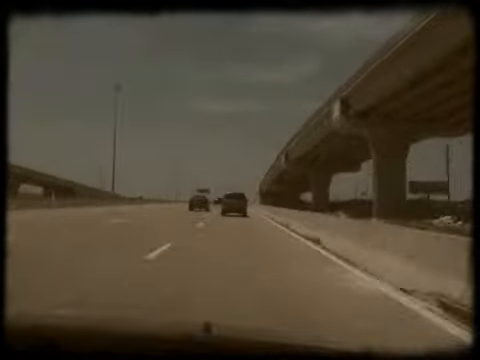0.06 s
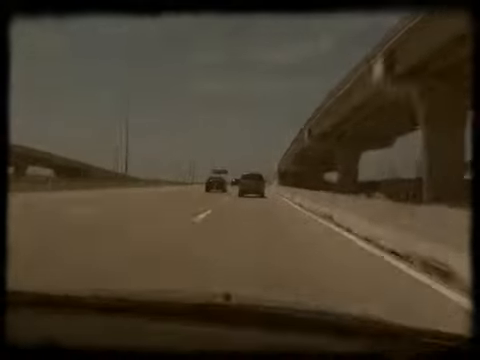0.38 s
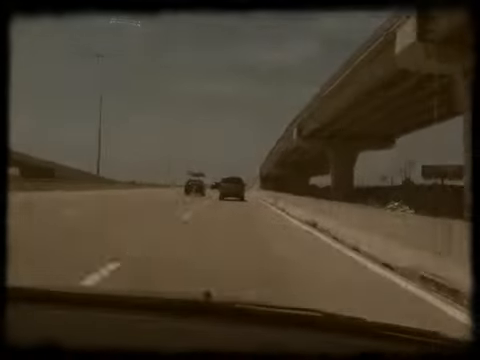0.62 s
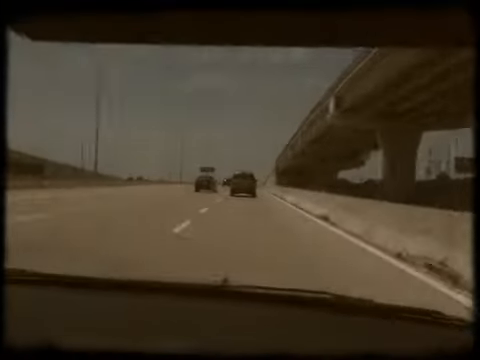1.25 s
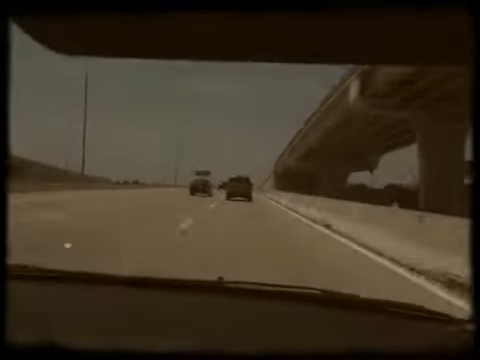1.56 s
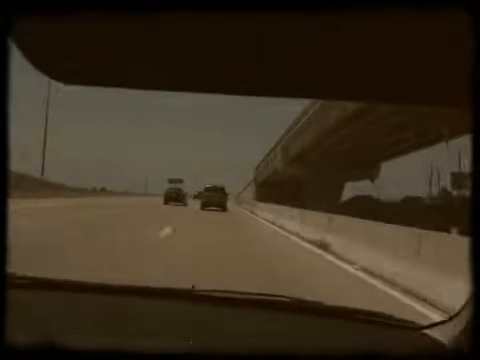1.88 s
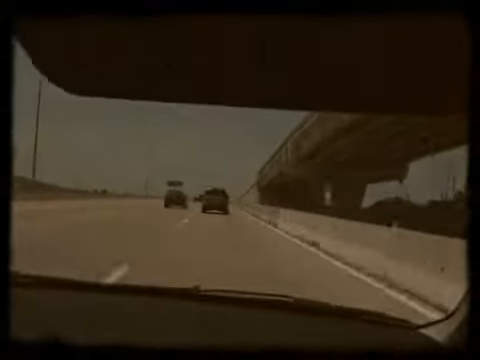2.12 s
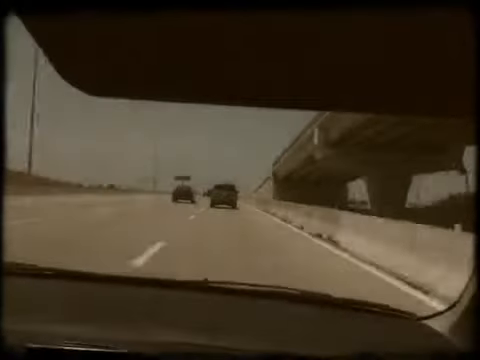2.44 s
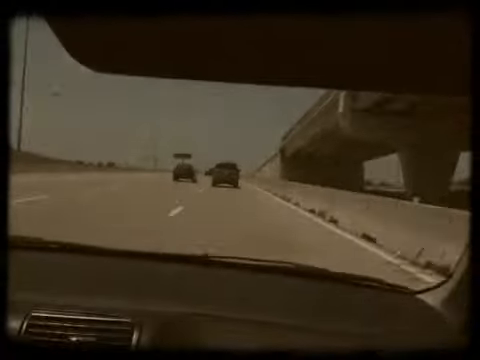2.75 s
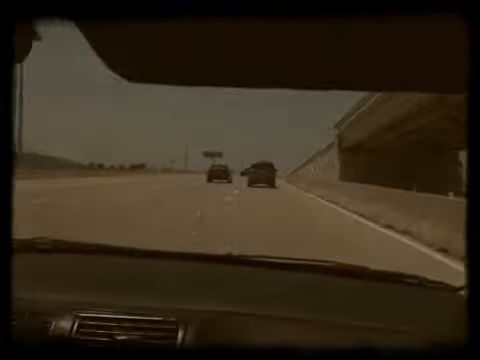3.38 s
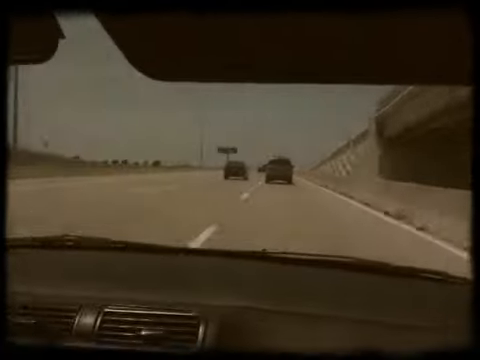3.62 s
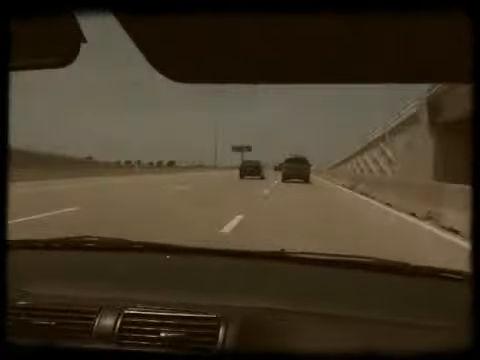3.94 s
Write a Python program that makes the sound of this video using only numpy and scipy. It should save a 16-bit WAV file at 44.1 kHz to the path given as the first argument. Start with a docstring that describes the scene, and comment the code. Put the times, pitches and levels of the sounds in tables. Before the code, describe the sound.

Tyre rumble inside a car at highway speed, then five thuds over pavement joints.

```python
"""Tyre rumble booming in a car's cabin at steady highway speed, with a hum of tyre air, a smooth rush
of tread and wind and a faint wavering drivetrain whine. From halfway on, five evenly spaced pavement
joints: each gives tread slaps, a front-axle thud, a softer rear one, tyre knocks and a short body shudder.
The tyre air rings on. Trim ticks at the first joint; a faint sizzle follows the second."""
import sys
import numpy as np
from scipy import signal
from scipy.fft import rfft, irfft
from scipy.io import wavfile

SR = 44100
rng = np.random.default_rng(int(sys.argv[2]) if len(sys.argv) > 2 else 0)


def dump(signal):
    """Clip the signal to [-1, 1] and save it as 16-bit WAV at the path in sys.argv[1]."""
    limited = np.clip(np.atleast_2d(signal).T, -1, 1)
    pcm = np.round(limited * 32767).astype(np.int16)
    wavfile.write(sys.argv[1], SR, pcm)


N = 176400
TIME_S = np.arange(N) / SR

# cabin rumble spectrum: f/Hz, relative level/dB
RUMBLE_SPECTRUM = [(25, -46), (40, -34), (62, -30.5), (80, -19), (100, -7.5), (126, -1.5), (190, -0.5),
                   (260, -2.5), (320, -7), (420, -17.5), (700, -40), (1500, -55), (8000, -100)]
# rumble over the changing road surface: t/s, level/dB
RUMBLE_LEVEL = [(0, -34.5), (.28, -34.5), (.45, -33), (.7, -35), (1.02, -32), (1.12, -36), (1.4, -33.5),
                (1.8, -34), (2.2, -32.5), (2.37, -34.5), (2.7, -32.5), (2.8, -36), (3.05, -30),
                (3.13, -38.5), (3.25, -33.5), (3.42, -31.5), (3.52, -35.5), (3.7, -31), (3.81, -36.5),
                (3.88, -32), (4, -35)]
# tyre and cabin resonances: f/Hz, half-width/Hz, level on the mean surface/dB
BOOM_MODES = [(131.7, 6.8, -46), (190.2, 14, -42), (260, 5.9, -45.5), (295.4, 6, -44), (594.3, 5.5, -58),
              (719.5, 11, -60.5), (1090, 23, -74), (1640, 39, -64), (1900, 51, -60.5)]
# tread growl, stronger on coarse road: t/s, level/dB
GROWL_LEVEL = [(0, -46), (.6, -54), (1.3, -45), (2.1, -41.5), (2.8, -49), (3.06, -41.5), (3.13, -47),
               (3.22, -44.5), (3.4, -45), (4, -47)]
# hum of the tyre air: t/s, level/dB
DRONE_LEVEL = [(0, -43.5), (.3, -42), (.45, -38), (.8, -36.5), (1.15, -35.5), (1.3, -40.5), (1.48, -32.5),
               (1.75, -43.5), (2.2, -36.5), (2.7, -44.5), (3.4, -40), (4, -39.5)]
# tread and wind through the glass: f/Hz, relative level/dB
RUSH_SPECTRUM = [(60, -41), (300, 5), (520, 3.5), (680, -1.5), (1050, 0.5), (1380, -5), (1700, -4.5),
                 (1930, -4), (2350, -12), (2900, -12.7), (3300, -13.5), (3850, -16), (4250, -20),
                 (4800, -18), (5400, -17.5), (6100, -22), (7100, -23.5), (9000, -31), (12000, -36),
                 (15500, -39.5)]
# rush envelope: t/s, level/dB
RUSH_ENVELOPE = [(0, -40), (.35, -41), (.8, -40.5), (1.15, -41), (1.45, -41), (2.5, -40.5), (3.2, -41),
                 (4, -41)]
# drivetrain whine: t/s, f/Hz, level/dB
WHINE_TRACK = [(0, 1220, -55), (.13, 1232, -57), (.32, 1256, -53), (.58, 1250, -59), (.83, 1251, -49.5),
               (1.1, 1249, -56.5), (1.6, 1247, -55.5), (2.35, 1267, -57), (3.2, 1250, -57.5),
               (4, 1261, -60)]
# ringing of the tyre air: t/s, level/dB
CAVITY_LEVEL = [(0, -53), (1.9, -49.5), (2.2, -39.5), (2.33, -45), (2.5, -38), (2.64, -39.5), (2.75, -34),
                (2.83, -36), (2.97, -37), (3.12, -44), (3.3, -38.5), (4, -39)]
# pavement joints at the front axle: t/s, shudder level/dB, slap level/dB
ROAD_JOINTS = [(2.076, -42, -44), (2.457, -35.5, -38), (2.842, -33, -38), (3.217, -37.5, -36),
               (3.602, -36.5, -41.5)]
# tread slap on a joint's edge: f/Hz, relative level/dB
SLAP_SPECTRUM = [(100, -49), (280, -3.5), (380, 4.5), (650, -6.5), (1100, -11), (1900, -21), (3000, -35),
                 (8000, -65)]
# suspension thuds (front, rear and, from joint 2 on, rebound): t/s, level/dB, f/Hz, sigma/s
AXLE_THUDS = [(2.075, -20.5, 156, 0.011), (2.162, -23.5, 125, 0.016), (2.457, -18, 142, 0.011),
              (2.562, -27, 122, .012), (2.597, -24.5, 128, .011), (2.843, -16, 147, 0.0085),
              (2.917, -25, 163, .012), (2.968, -25.5, 115, .013), (3.217, -19, 146, 0.016),
              (3.316, -22, 134, 0.0096), (3.348, -35, 116, .012), (3.602, -18.5, 147, .0095),
              (3.692, -23, 140, 0.0086), (3.727, -22.5, 125, 0.013)]
# tyre carcass knocks: t/s, level/dB, f/Hz
CARCASS_KNOCKS = [(2.073, -29, 280.3), (2.228, -24.5, 245), (2.442, -26.5, 270), (2.53, -24.5, 254),
                  (2.596, -24, 213), (2.836, -33, 275), (2.862, -25, 225), (2.916, -19.5, 245),
                  (3.207, -23.5, 285), (3.247, -24, 226), (3.290, -25.5, 295), (3.355, -23.5, 223),
                  (3.602, -26, 260), (3.675, -23, 274)]
# body shudder after a joint: f/Hz, relative level/dB
SHUDDER_SPECTRUM = [(30, -42), (60, -12), (90, -13), (125, 3), (200, 1), (262, 0), (330, -14.5),
                    (450, -19.5), (900, -32), (5000, -88)]


def from_db(db):
    """Decibels to gain."""
    return 10 ** (np.asarray(db) / 20)


def per_sample(rows):
    """Each column after t/s, interpolated per sample."""
    t_s, *columns = np.transpose(rows)
    return [np.interp(TIME_S, t_s, column) for column in columns]


def noise(gain_at):
    """Unit-rms noise shaped by gain_at(f/Hz)."""
    hz = np.maximum(np.arange(N // 2 + 1) * SR / N, 1)
    shaped = irfft(rfft(rng.standard_normal(N)) * gain_at(hz), N)
    return shaped / np.sqrt(np.mean(shaped ** 2) + 1e-20)


def coloured(spectrum):
    """Unit-rms noise with a tabulated spectrum."""
    points_hz, db = np.transpose(spectrum)
    return noise(lambda hz: from_db(np.interp(np.log(hz), np.log(points_hz), db)))


def resonance(centre_hz, half_width_hz):
    """Unit-rms noise in one resonance; half-width at -6 dB."""
    return noise(lambda hz: 1 / (1 + ((hz - centre_hz) / half_width_hz) ** 2))


def drift(corner_hz):
    """Slow random motion, unit rms."""
    return resonance(0, corner_hz)


def tone(hz, db, wander_hz, flutter_db):
    """Sine around an rms level, unsteady in pitch and strength."""
    phase = 2 * np.pi * np.cumsum(hz + wander_hz * drift(corner_hz=14.1)) / SR
    return from_db(db + flutter_db * drift(corner_hz=24)) * np.sqrt(2) * np.sin(phase)


def swell(t_s, sigma_s):
    """Gaussian envelope, peak 1."""
    return np.exp(-.5 * np.minimum(((TIME_S - t_s) / sigma_s) ** 2, 100))


def pressure_dip(t_s, hz, sigma_s, sag_oct_per_s):
    """Dip in cabin pressure amid a few soft swings, sinking in pitch."""
    octaves = np.clip(-sag_oct_per_s * (TIME_S - t_s), -1, 1)
    turns = np.cumsum(hz * 2 ** octaves) / SR
    turns -= np.interp(t_s, TIME_S, turns)
    return -swell(t_s, sigma_s) * np.cos(2 * np.pi * turns)


def tyre_rumble():
    """Road texture shakes the body: broad rumble, narrow booms that follow it, tread growl."""
    rumble_db, = per_sample(RUMBLE_LEVEL)
    growl_db, = per_sample(GROWL_LEVEL)
    booms = sum(from_db(db) * resonance(hz, half_width_hz) for hz, half_width_hz, db in BOOM_MODES)
    growl = from_db(growl_db) * resonance(centre_hz=351.8, half_width_hz=26.5)
    rumble = from_db(rumble_db) * coloured(RUMBLE_SPECTRUM)
    return rumble + from_db(rumble_db - rumble_db.mean()) * booms + growl


def tyre_drone():
    """Air inside the rolling tyres hums near one pitch."""
    db, = per_sample(DRONE_LEVEL)
    return tone(230.8, db, wander_hz=1.625, flutter_db=1.3)


def rush(flutter_db=.38):
    """Steady tread and wind noise through the glass."""
    db, = per_sample(RUSH_ENVELOPE)
    return from_db(db + flutter_db * drift(corner_hz=9.7)) * coloured(RUSH_SPECTRUM)


def drivetrain_whine():
    """One thin, wavering gear tone."""
    hz, db = per_sample(WHINE_TRACK)
    return tone(hz, db, wander_hz=6.07, flutter_db=2.3)


def cavity_ring():
    """Tyre air resonates: faint at first, stronger over the joints."""
    db, = per_sample(CAVITY_LEVEL)
    return from_db(db) * resonance(centre_hz=259.2, half_width_hz=6.9)


def tread_slaps(lead_s=.011, axle_lag_s=.093):
    """Tread hits each joint's edge, front then rear; lag = wheelbase / speed."""
    envelope = sum(from_db(db) * swell(t_s + lag_s - lead_s, sigma_s=.0097)
                   for t_s, _, db in ROAD_JOINTS for lag_s in (0, axle_lag_s))
    return envelope * coloured(SLAP_SPECTRUM)


def carcass_knocks():
    """Tyre carcasses knock as the wheels cross and settle."""
    return sum(from_db(db) * pressure_dip(t_s, hz, sigma_s=.0061, sag_oct_per_s=4)
               for t_s, db, hz in CARCASS_KNOCKS)


def suspension_thuds():
    """Deep axle blows; the low part of each arrives last."""
    return sum(from_db(db) * pressure_dip(t_s, hz, sigma_s, sag_oct_per_s=12.7)
               for t_s, db, hz, sigma_s in AXLE_THUDS)


def body_shudder(delay_s=.097):
    """The body shakes briefly after each joint."""
    envelope = sum(from_db(db) * swell(t_s + delay_s, sigma_s=.063) for t_s, db, _ in ROAD_JOINTS)
    return envelope * coloured(SHUDDER_SPECTRUM)


def trim_tick(t_s=2.083, decay_s=.005, burst_db=-53.5, highpass_hz=9500):
    """Plastic trim ticks once at the first jolt."""
    envelope = (TIME_S >= t_s) * np.exp(-np.abs(TIME_S - t_s) / decay_s)
    burst = from_db(burst_db) * envelope * rng.standard_normal(N)
    highpass = signal.butter(2, highpass_hz, "high", fs=SR, output="sos")
    return signal.sosfilt(highpass, burst + 1e-18)


def sizzle(level_db=-74):
    """Brief, thin treble sizzle after the second joint."""
    return from_db(level_db) * swell(t_s=2.6, sigma_s=.06) * resonance(centre_hz=10600, half_width_hz=600)


def scene():
    """Mono mix at the front seat."""
    cruise = tyre_rumble() + tyre_drone() + rush() + drivetrain_whine() + cavity_ring()
    jolts = tread_slaps() + carcass_knocks() + suspension_thuds() + body_shudder()
    return (cruise + jolts + trim_tick() + sizzle())[None]


def record(dry):
    """Short edge fades, steep low-pass."""
    fade_s, cutoff_hz = .004, 15700
    fade = np.minimum(np.minimum(TIME_S, TIME_S[::-1]) / fade_s, 1)
    lowpass = signal.ellip(12, .1, 80, cutoff_hz, fs=SR, output="sos")
    return signal.sosfilt(lowpass, dry * fade)


dry = scene()
out = record(dry)
dump(out)
```